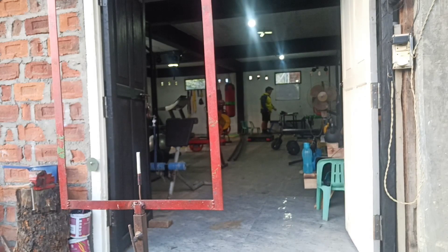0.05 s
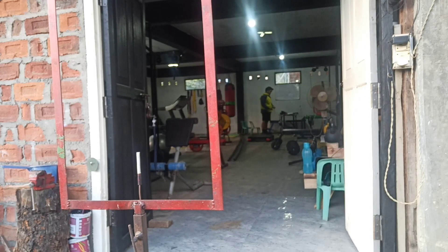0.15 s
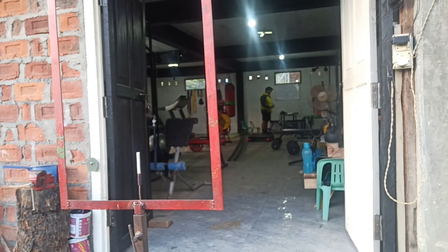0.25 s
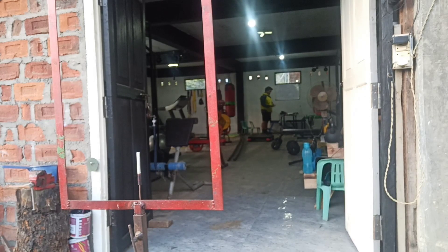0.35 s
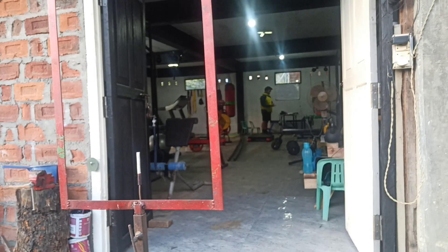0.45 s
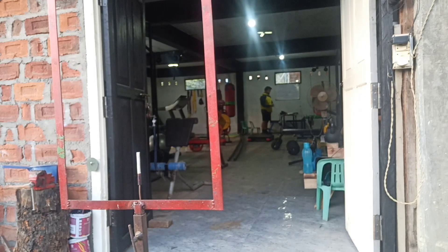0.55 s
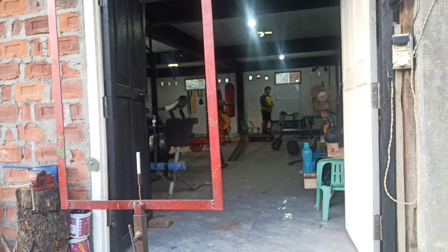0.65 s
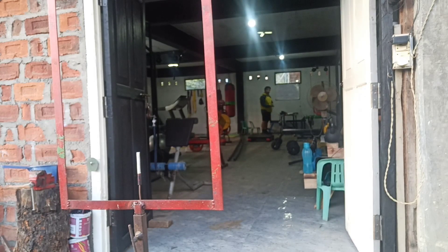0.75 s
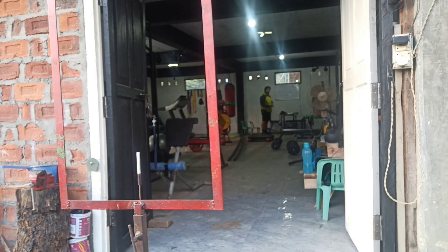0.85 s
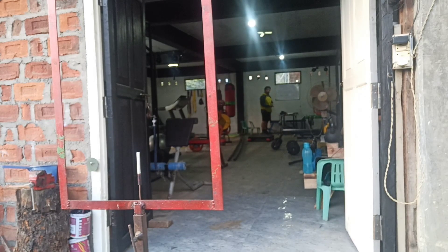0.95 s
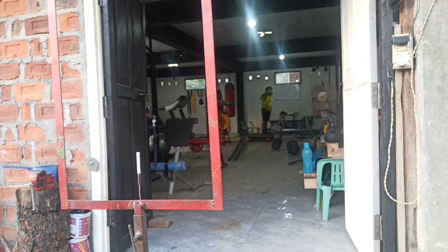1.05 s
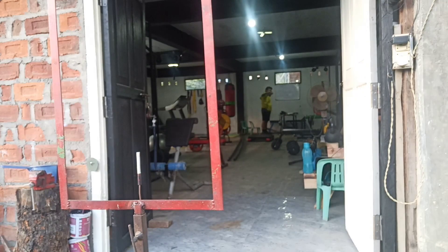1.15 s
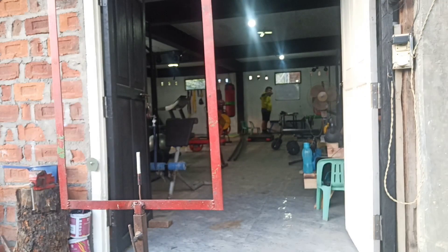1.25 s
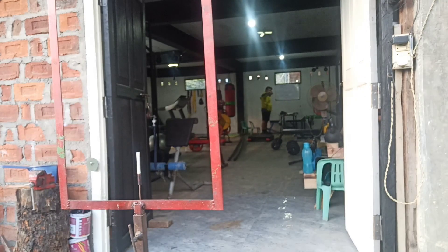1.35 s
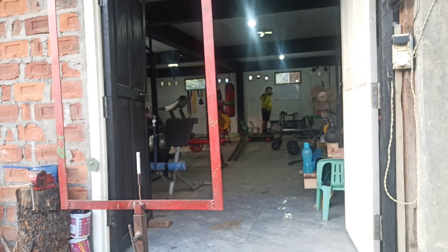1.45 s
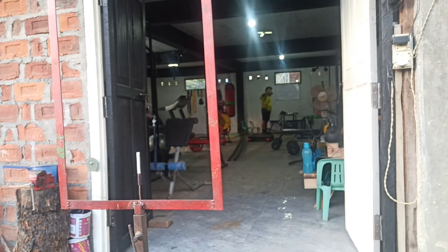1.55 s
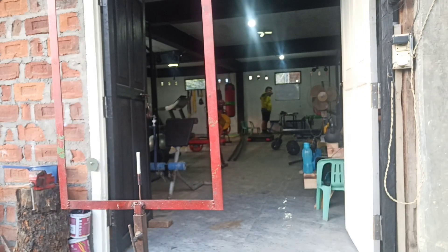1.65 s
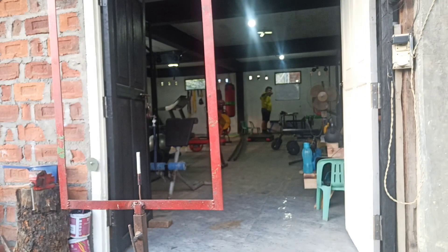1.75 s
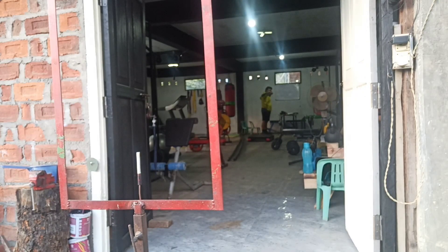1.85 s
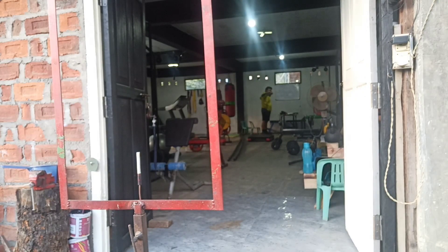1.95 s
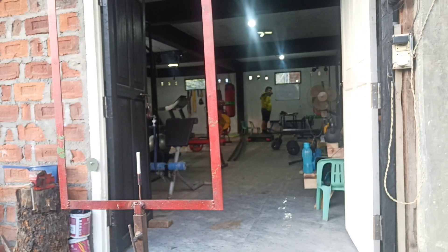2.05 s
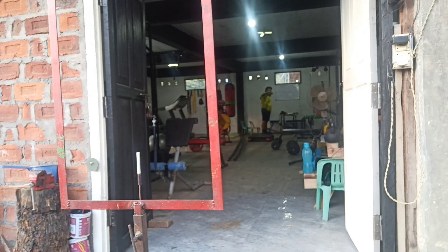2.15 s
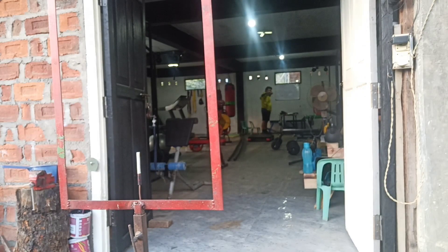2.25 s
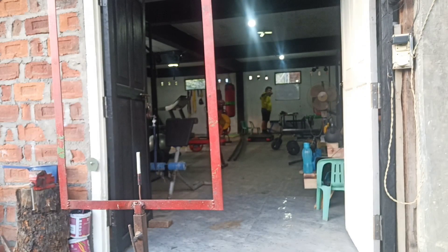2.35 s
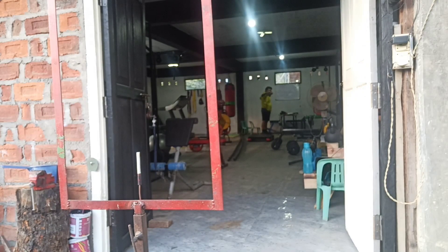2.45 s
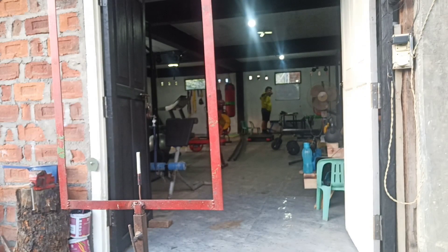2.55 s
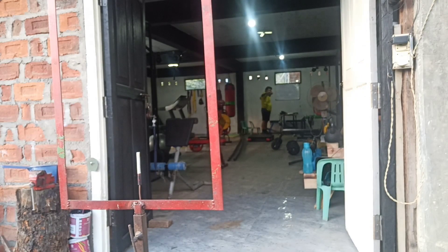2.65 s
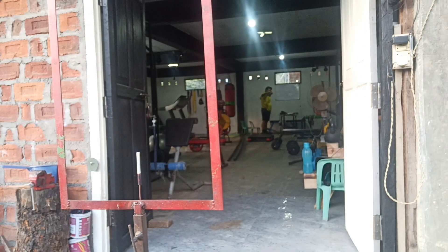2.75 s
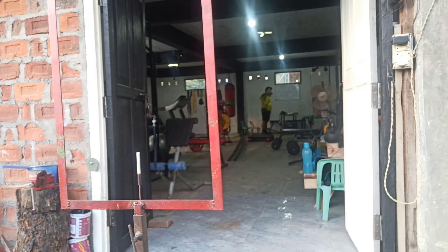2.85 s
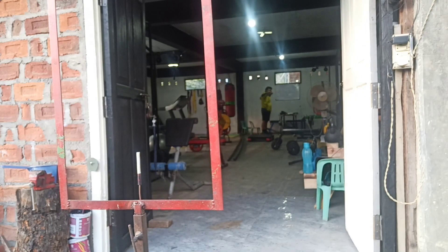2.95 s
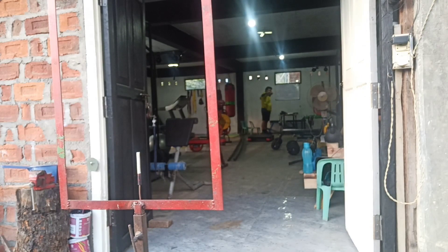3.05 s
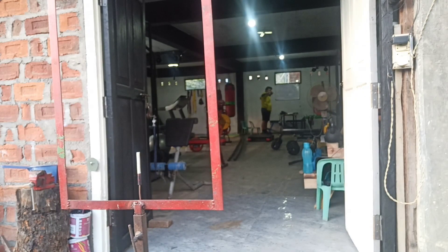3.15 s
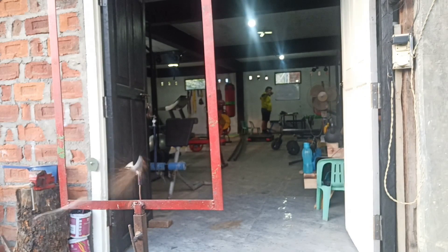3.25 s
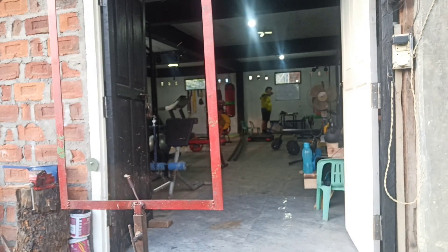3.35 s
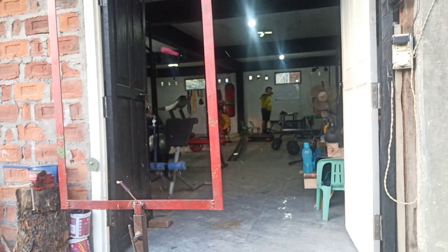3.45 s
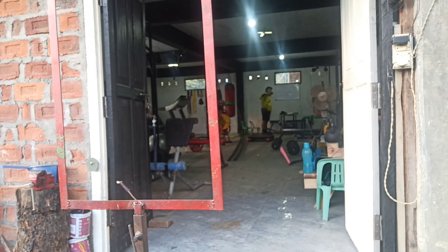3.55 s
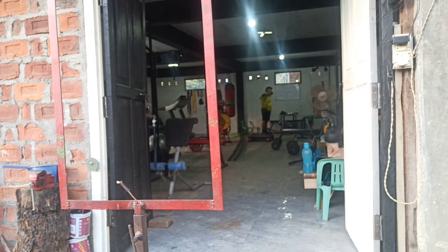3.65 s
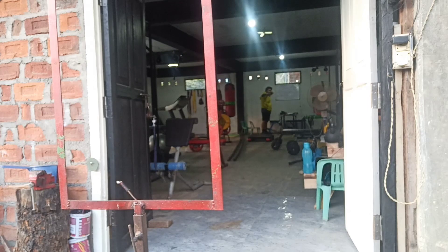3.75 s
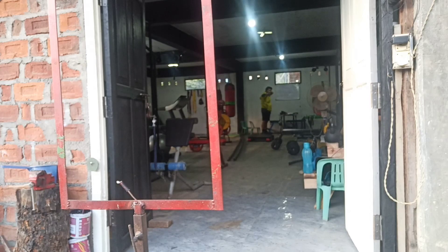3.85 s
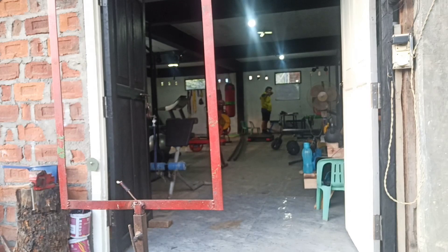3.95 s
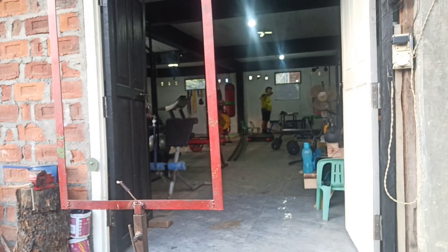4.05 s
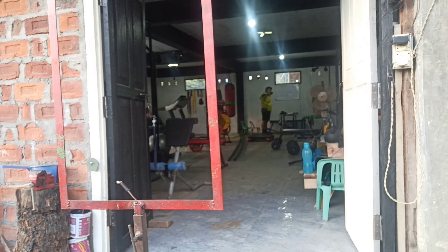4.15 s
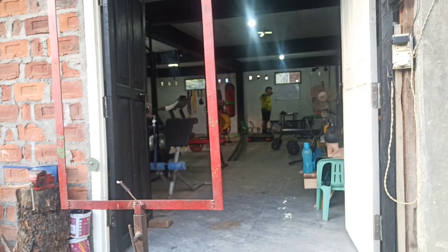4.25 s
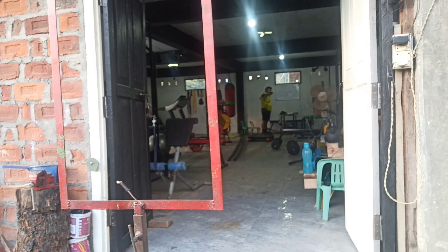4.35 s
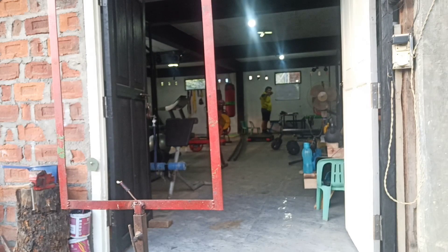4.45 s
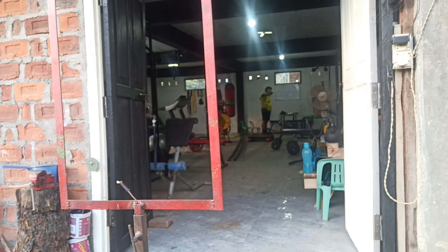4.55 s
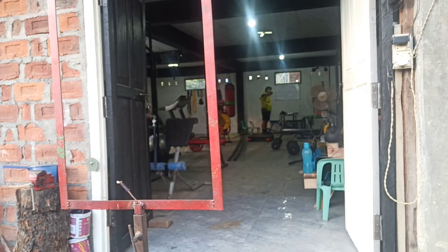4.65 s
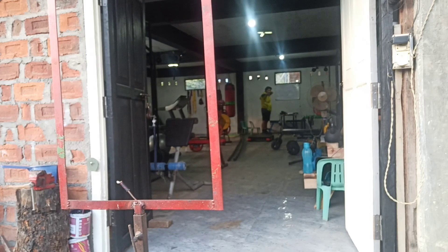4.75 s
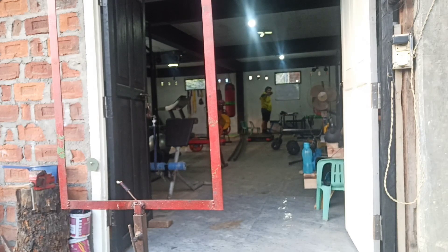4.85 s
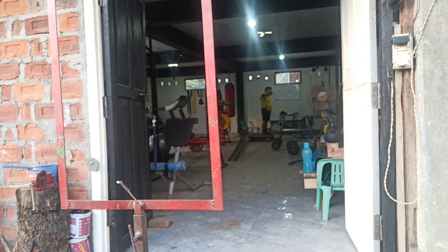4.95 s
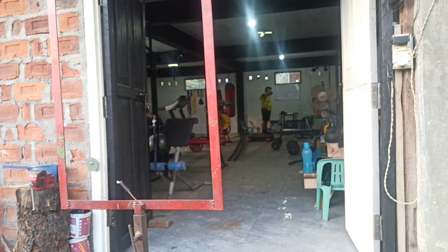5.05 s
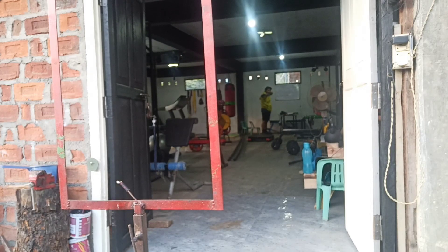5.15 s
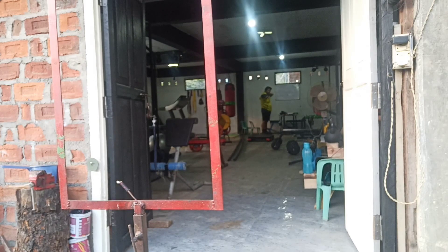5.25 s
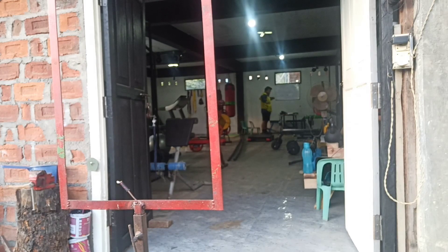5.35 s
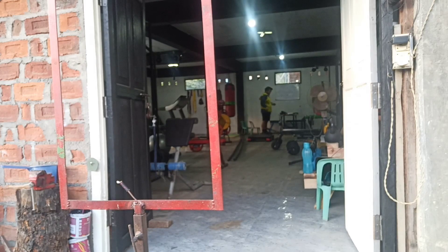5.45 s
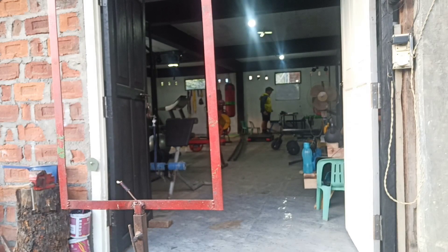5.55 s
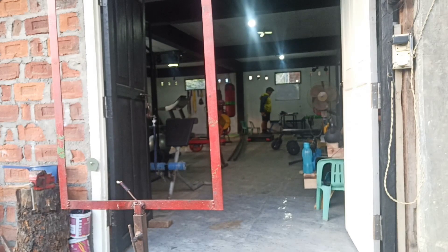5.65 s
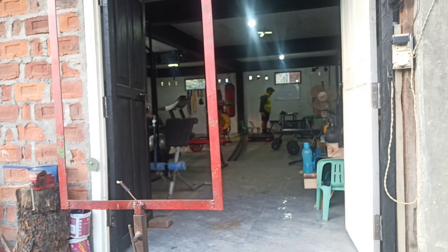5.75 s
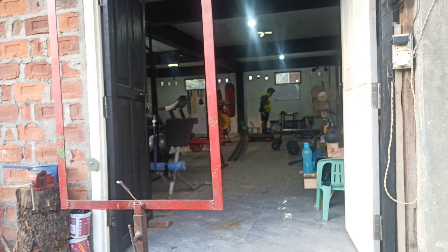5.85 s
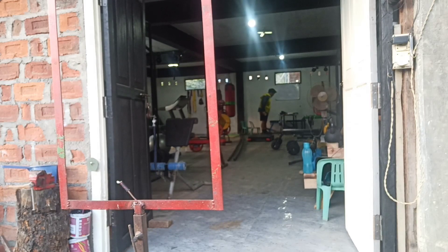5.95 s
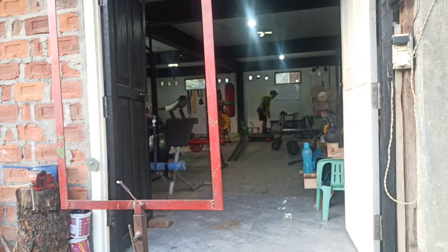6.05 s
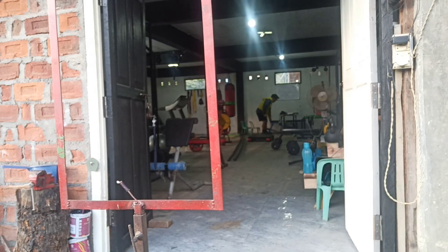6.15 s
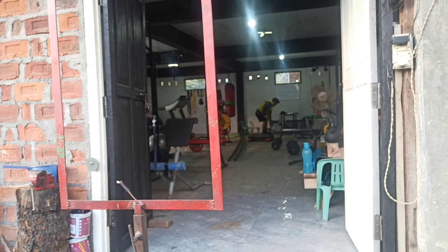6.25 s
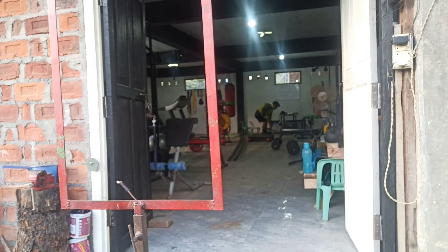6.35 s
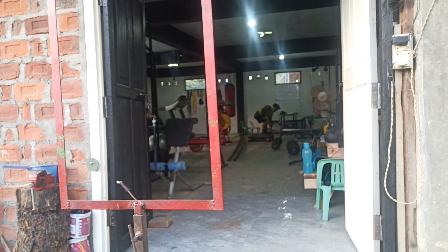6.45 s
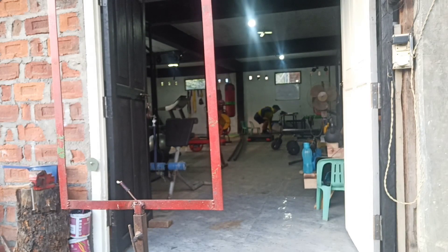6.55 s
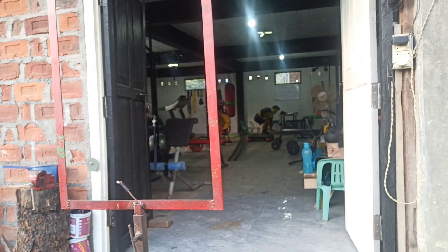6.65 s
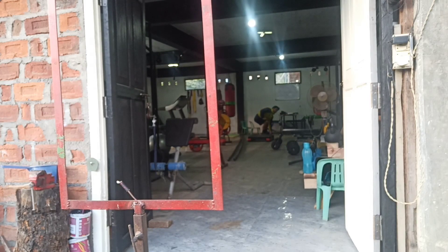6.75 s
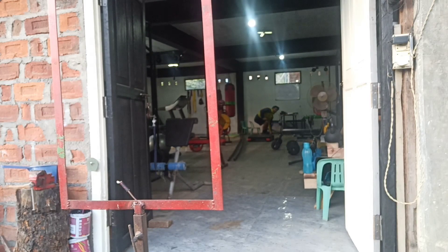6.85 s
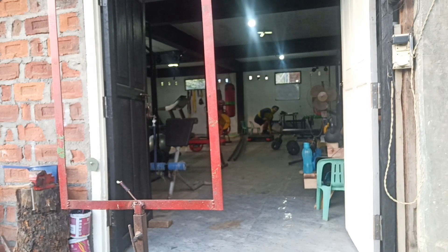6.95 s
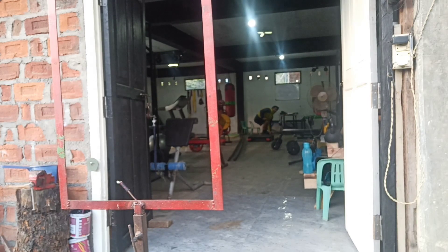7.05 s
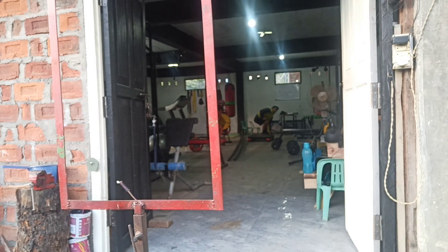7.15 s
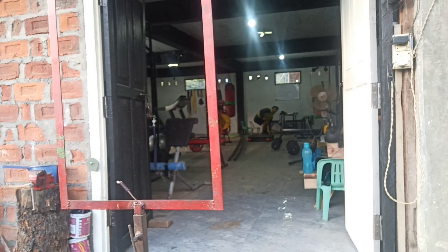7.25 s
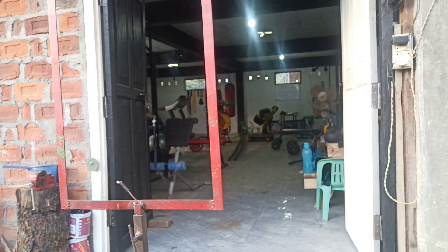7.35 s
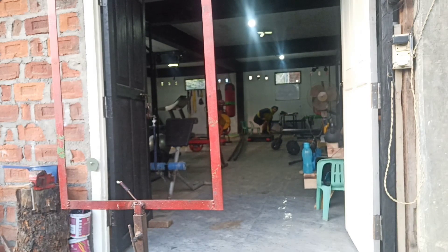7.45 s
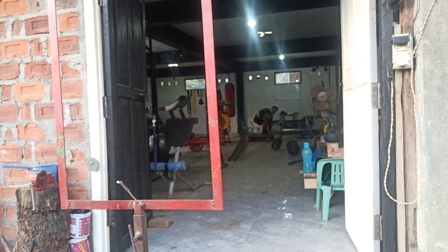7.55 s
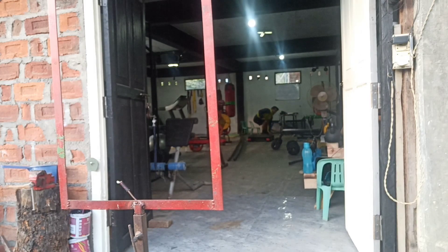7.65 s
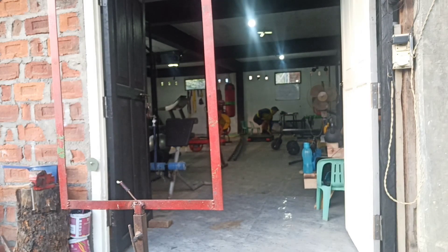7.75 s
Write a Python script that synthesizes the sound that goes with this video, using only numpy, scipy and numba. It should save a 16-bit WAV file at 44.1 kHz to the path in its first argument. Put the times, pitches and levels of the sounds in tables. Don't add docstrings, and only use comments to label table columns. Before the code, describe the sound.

A slingshot snaps far off, a sharp crack and heavy thud hit close by, then a metal bar clangs and rings through a hall.

```python
import sys
import numpy as np
from scipy import signal
from scipy.fft import rfft, irfft, next_fast_len
from scipy.io import wavfile
from scipy.ndimage import uniform_filter1d
from numba import njit

SR = 44100
rng = np.random.default_rng(int(sys.argv[2]) if len(sys.argv) > 2 else 0)


def convert_level_to_amplitude(level_db):
    exponent = np.asarray(level_db, float) / 20
    return 10 ** exponent


def to_wav(sig):
    pcm = np.clip(np.atleast_2d(sig), -1, 1) * 32767
    pcm = np.round(pcm).astype(np.int16)
    wavfile.write(sys.argv[1], SR, pcm.T)


N = 343980

HITS = {"rustle": [(3.2568, -30.5, -28.5, 9970), (5.99, -51, -71, 8000), (6.869, -51, -71.5, 8470),
        (7.385, -55, -69, 6950)], "slap": [(3.2575, -33.5, -40, 1320), (3.2574, -39, -40, 249),
        (3.413, -16.5, -39, 1760), (3.8115, -30, -59, 8550), (4.3469, -48.5, -56, 9640),
        (4.759, -13.5, -24, 10040)], "crack": [(3.3925, -7.5, -38, 7580), (3.3945, -12.5, -41, 7620),
        (3.397, -19, -50, 7010), (3.4222, -16, -47, 3823), (4.3469, -51, -53, 3800)],
        "ping": [(4.3468, -40.5, -49.5, 2320), (4.759, -17.5, -29, 3365)],
        "smack": [(3.4077, -10, -34, 3000), (3.883, -22, -42, 3780), (4.759, -32.5, -48.5, 500)],
        "knock": [(3.437, -25, -44.5, 3034), (3.902, -21.5, -56.5, 2986)]}
CONTACTS = {"rustle": (12, 1), "slap": (9.9, 0.77), "crack": (2.2, .5), "ping": (5.8, 0.29),
            "smack": (3.3, 2.1), "knock": (2.5, 1.2)}
# t/s, direct level/dB
TICKS = [(3.69, -43.5), (3.72, -42), (3.7829, -45), (3.838, -39), (3.94, -43.5), (4.063, -60.5),
         (4.113, -52), (4.18, -53), (4.2141, -42)]
TICK_MS, TICK_HZ, TICK_OCTAVES = 0.98, 9000, 1.5
TICK_HALL_DB = -22
# t/s, peak level/dB, f/Hz, T60/s, hall level/dB
THUDS = [(3.4085, -2, 227.3, 0.067, -21), (3.4079, -11, 467, 0.051, -23.5), (3.4087, -16, 388.7, .05, -40),
         (3.4088, -19, 844, 0.027, -45), (3.4091, -36, 89.8, .05, -36.5), (3.43, -28, 252.4, 2.3, -39),
         (3.43, -26, 358, .9, -46), (5.476, -45.5, 176, 0.14, -64.5), (5.48, -49.5, 488, 0.053, -66.5),
         (6.619, -43, 219, 0.093, -67.5), (6.63, -41.5, 261.5, 0.04, -66), (6.62, -54, 620, 0.045, -65.5),
         (7.178, -45.5, 225, 0.059, -69)]
# t/s, pressure/1, half-width/ms
WAKE = [
    (3.3903, .11, 5),
    (3.4063, -.08, 3.5),
]

# f/Hz, level/dB, T60/s
BAR = [(883, -20, 0.92), (1531.8, -4, 1.374), (1800, -3.5, 0.7), (2140, -11.5, .6), (2349, -6, 0.64),
       (2432, -1, 0.8), (3010, -7.5, .6), (3364, -5, 0.92), (3600, -3, .75), (3893, -7, 0.89),
       (4300, -13.5, 0.4), (7200, -7, 0.37), (7400, -6.5, 0.83), (7575, -4.5, .6)]
BAR_S, BAR_DB, BAR_SWELL_S = 4.759, -18, 0.09
BEAT_DB = 1.5
# f/Hz, level/dB
FRAME = [(300, -41.5), (1300, -34), (1700, -17.5), (2500, -7.5), (4500, -14.5), (7000, -7.5), (10000, -12),
         (15500, -16.5)]
FRAME_DB, FRAME_WET_DB = -33.5, -52
FRAME_T60_S, FRAME_SWELL_S = 0.42, 0.12

# f/Hz, T60/s
HALL = [(80, 1.5), (160, 1.6), (250, 1.82), (400, 1.44), (800, 1.45), (1500, 0.99), (4000, 0.98),
        (8000, 0.83), (12000, 0.5), (15000, .42)]
HALL_RISE_S = 0.0024

CHIRPS = {"cheep": [(.14, -68, 3390), (1.445, -46.5, 3310), (2.175, -46.5, 3330), (2.38, -54, 3215),
          (2.54, -56, 3490), (3.007, -51.5, 3600), (3.186, -58.5, 2900), (5.945, -64, 3000),
          (6.293, -54, 3400), (7.0, -60, 2890), (7.504, -59, 2870)], "chirp": [(.62, -65, 3700),
          (.88, -65, 3480), (1.08, -62, 3385), (1.99, -62, 3420), (5.65, -66, 4830), (6.53, -61.5, 3580),
          (7.148, -58, 3320)], "seep": [(.8, -65, 6270), (1.08, -64, 5720), (1.468, -62, 5720),
          (1.5, -55.5, 6220), (1.96, -58, 6060), (2.04, -63, 6040), (2.2, -74, 6400), (2.4, -66, 5530),
          (3.08, -60.5, 6050), (6.374, -60.5, 5470)], "pip": [(1.588, -57.5, 6430), (2.6, -64.5, 6600),
          (2.668, -59.5, 6330), (2.74, -68, 5420), (2.835, -51.5, 3950), (3.122, -55, 6470),
          (5.562, -55.5, 6450), (6.486, -54.5, 6460), (7.437, -61.5, 6500)]}
CALL = {"cheep": (1.5, .1, 660), "chirp": (1.5, .12, 900), "seep": (1.3, .115, 900),
        "pip": (1.05, .075, 380)}
YARD_ECHO_T60_S = 0.4

# t/s, length/s, f/Hz, first partial level/dB, second partial level/dB
CROWS = [
    [(0.105, .65, 810, -80.5, -76)],
    [(1.99, .19, 719, -70, -58), (2.23, 0.17, 753, -68, -55.5), (2.48, .3, 754.7, -67, -57),
     (2.76, 0.268, 792, -71.5, -62), (3.09, 0.38, 775, -74, -59)],
    [(7.083, 0.55, 824.4, -72, -75.5)],
]
CROW_ROUGH = [0.014, 0.09, 0.018]
CROW_WAVER = [0.016, .06, 0.014]
# first partial/dB, second partial/dB
CROW_FADE_DB = [(-6.5, -4), (-2.5, -14), (0.5, -3.5)]
CROW_ATTACK_S, CROW_RELEASE_S = 0.04, 0.05
CROW_RATTLE_HZ = 100.3
CROW_SAG = 0.015

# f/Hz, width/Hz, level/dB
ENGINE_LINES = [(59, 10, -4), (97, 9.3, 3), (178.5, 8.9, 2)]
ENGINE_DB, ENGINE_LOPE_DB = -65, 1.5
ENGINE_STOPS_S, ENGINE_FADE_S = 1.25, 0.028

# f/Hz, level per Hz/dB
YARD = [(30, -37), (60, -3.5), (120, 1), (400, -8.5), (900, -16.5), (1300, -15.5), (2500, -22.5),
        (4000, -19), (8000, -26), (15000, -21.5)]
YARD_DB, FLICKER_DB = -64, 1.4
GUST_S, GUST_DB, GUST_LENGTH_S, GUST_HZ = 6.49, 5.5, 0.35, 1508

# f/Hz, level/dB
MIC = [(20, -9), (90, -3), (900, 3), (1100, 0.5), (4700, 0), (4900, -6), (6000, -3.5), (6250, 1.5),
       (7600, 3.5), (7800, -1), (8550, -4.5), (8750, -17.5), (11500, -27.5), (11700, -6.5)]
# f/Hz, level/dB
END_COLOUR = [(60, -12), (1000, 4), (3000, -9), (8500, -5), (12000, 4.5), (13500, -5), (15000, -22)]
SWITCH_S, TOP_HZ = 7.722, 15550
HISS_DB = -88
LIMIT_DB, ATTACK_S, RELEASE_S, RATIO = -22, 0.017, 0.049, 2.2

SHORT = 2 ** 13
SIZE = next_fast_len(N + 3 * SR)
T = np.arange(N) / SR
HZ = np.maximum(np.arange(SIZE // 2 + 1) * SR / SIZE, 1)


def hits():
    near, far = np.zeros(N), np.zeros(N)
    t = T[:SHORT] - SHORT / 2 / SR
    rows = [(*row, *CONTACTS[kind]) for kind in HITS for row in HITS[kind]]
    rows += [(s, db, db + TICK_HALL_DB, TICK_HZ, TICK_MS, TICK_OCTAVES) for s, db in TICKS]
    for s, direct_db, hall_db, hz, ms, octaves in rows:
        fade = (t >= 0) * np.exp(-np.abs(t) * 1000 / ms)
        puff = colour(fade * rng.standard_normal(SHORT), hz, octaves)
        add(near, s + t[0], convert_level_to_amplitude(direct_db) * puff / np.abs(puff).max())
        add(far, s + t[0], convert_level_to_amplitude(hall_db) * click(hz, octaves))
    return near, far


def thuds():
    near = sum(push * np.exp(-((s - T) * 1000 / ms) ** 2) for s, push, ms in WAKE)
    far = np.zeros(N)
    for s, peak_db, hz, t60, hall_db in THUDS:
        t = T[:int(t60 * SR)]
        add(near, s, convert_level_to_amplitude(peak_db - 60 * t / t60) * np.sin(2 * np.pi * hz * t))
        add(far, s + 1 / hz - SHORT / 2 / SR, convert_level_to_amplitude(hall_db) * click(hz, 0.53))
    return near, far


def bar(count=1500):
    place = rng.random(count)
    scatter = rng.standard_normal((count, 2))
    hz = 300 + 15200 * place ** 1.4
    level_db = on_log(FRAME, hz) - 1.5 + 0.98 * scatter[:, 0]
    t60 = FRAME_T60_S * convert_level_to_amplitude(1.2 * scatter[:, 1]) / np.hypot(1, hz / 11000)
    frame = ring(np.transpose([hz, level_db, t60]), FRAME_SWELL_S, 0.51)
    beating = convert_level_to_amplitude(BAR_DB + BEAT_DB * walk(25.0))
    strong = beating * ring(BAR, BAR_SWELL_S, 0.91)
    return strong + convert_level_to_amplitude(FRAME_DB) * frame, convert_level_to_amplitude(FRAME_WET_DB) * frame + convert_level_to_amplitude(-50) * strong


def sparrows():
    song = np.zeros(N)
    burr = np.tanh(0.9 * walk(1200))
    calls = [(*row, *CALL[call]) for call in CHIRPS for row in CHIRPS[call]]
    for s, db, last_hz, fall, length, hoarse in calls:
        first_hz = fall * last_hz
        u = np.arange(0, 1, 1 / (length * SR))
        glide = last_hz + (first_hz - last_hz) * (1 - u) ** 2.4
        pitch = glide + hoarse * burr[int(s * SR):][:len(u)]
        phase = 2 * np.pi * np.cumsum(pitch) / SR
        whistle = np.sin(phase) + 0.082 * np.sin(2 * phase)
        add(song, s, convert_level_to_amplitude(db) * np.sin(np.pi * u ** 0.51) * whistle)
    walls = rng.standard_normal(SR // 2) * convert_level_to_amplitude(-60 * T[:SR // 2] / YARD_ECHO_T60_S)
    smeared = shape(song, rfft(walls, SIZE))
    return convert_level_to_amplitude(-8.0) * song + convert_level_to_amplitude(-36.0) * smeared, convert_level_to_amplitude(-46.0) * song


def roosters():
    crow = np.zeros(N)
    for rows, rough, scatter, fades in zip(CROWS, CROW_ROUGH, CROW_WAVER, CROW_FADE_DB):
        waver = 1 + scatter * walk(300)
        rattle = 2 * np.pi * np.cumsum(CROW_RATTLE_HZ * (1 + 0.3 * walk(40))) / SR
        flutter_db = 40 * rough * np.array([walk(30), walk(30)])
        for s, length, hz, first_db, second_db in rows:
            u = np.clip((T - s) / length, 0, 1)
            rise, fall = (T - s) / CROW_ATTACK_S, (s + length - T) / CROW_RELEASE_S
            breath = np.clip(np.minimum(rise, fall), 0, 1)
            phase = 2 * np.pi * np.cumsum(hz * (1 - CROW_SAG * u) * waver) / SR
            first = np.sin(phase) + 15.0 * rough * np.sin(phase - rattle)
            second = np.sin(2 * phase) + 1.7 * rough * np.sin(2 * phase - rattle)
            for partial, db, fade_db, flutter in zip((first, second), (first_db, second_db), fades, flutter_db):
                crow += breath * convert_level_to_amplitude(db + fade_db * u + flutter) * partial
    return convert_level_to_amplitude(-2) * crow, convert_level_to_amplitude(-36.0) * crow


def engine():
    gain = sum(convert_level_to_amplitude(db) / np.hypot(1, (HZ - hz) / width) ** 2 for hz, width, db in ENGINE_LINES)
    drone = shape(rng.standard_normal(N), gain)
    lope = convert_level_to_amplitude(ENGINE_DB + ENGINE_LOPE_DB * walk(7.8))
    running = np.clip((ENGINE_STOPS_S - T) / ENGINE_FADE_S, 0, 1)
    return drone / drone.std() * lope * running


def yard():
    air = 0
    gust_db = GUST_DB * np.exp(-((T - GUST_S) / GUST_LENGTH_S) ** 2)
    for hz in 30 * 2 ** np.arange(10):
        band = shape(rng.standard_normal(N), bell(hz, 0.4) * convert_level_to_amplitude(on_log(YARD)))
        air = air + band * convert_level_to_amplitude(FLICKER_DB * walk(4.4) + gust_db * bell(GUST_HZ, 1.8, axis=hz))
    return air / air.std() * convert_level_to_amplitude(YARD_DB)


def hall():
    t, tail = T[:3 * SR], 0
    for hz in 50 * 2 ** np.arange(0, 8.6, 0.5):
        band = shape(rng.standard_normal(3 * SR), bell(hz, 1 / 4))[:3 * SR]
        tail = tail + band * convert_level_to_amplitude(-60 * t / on_log(HALL, hz))
    return rfft(tail * (1 - np.exp(-t / HALL_RISE_S)), SIZE)


def ring(modes, swell_s, late):
    out = np.zeros(2 * SR)
    for hz, db, t60 in modes:
        t = T[:int(min(t60, 2) * SR)]
        out[:len(t)] += convert_level_to_amplitude(db - 60 * t / t60) * np.sin(2 * np.pi * (hz * t + rng.random()))
    swell = (1 - min(late, 1) * np.exp(-T[:2 * SR] / swell_s)) ** 2
    track = np.zeros(N)
    add(track, BAR_S, out * swell)
    return track


def click(hz, octaves):
    pulse = colour(1.0 * (np.arange(SHORT) == SHORT // 2), hz, octaves)
    return pulse / np.sqrt(np.sum(pulse ** 2))


def colour(x, hz, octaves):
    axis = np.maximum(np.arange(SHORT // 2 + 1) * SR / SHORT, 1)
    return irfft(rfft(x, SHORT) * bell(hz, octaves, axis=axis), SHORT)


def add(track, s, sound):
    start = int(s * SR)
    track[start:start + len(sound)] += sound[:N - start]


def shape(x, gain):
    return irfft(rfft(x, SIZE) * gain, SIZE)[:N]


def on_log(table, hz=HZ):
    table_hz, values = np.array(table)[:, 0], np.array(table)[:, 1]
    return np.interp(np.log(hz), np.log(table_hz), values)


def bell(hz, octaves, axis=HZ):
    return np.exp(-0.5 * (np.log2(axis / hz) / octaves) ** 2)


def walk(rate):
    k = int(SR / rate)
    steps = np.repeat(rng.standard_normal(N // k + 1), k)
    return uniform_filter1d(uniform_filter1d(steps, k), k)[:N]


@njit
def follow(x, attack, release):
    env, e = np.empty(len(x)), 1e-6
    for i in range(len(x)):
        e += (abs(x[i]) - e) * (attack if abs(x[i]) > e else release)
        env[i] = e
    return env


def scene():
    parts = [hits(), thuds(), bar(), sparrows(), roosters()]
    direct = sum(near for near, far in parts)
    echo = shape(sum(far for near, far in parts), hall())
    return (direct + echo + engine() + yard())[None]


def band_limit(x):
    return signal.sosfilt(signal.butter(12, 16690, fs=SR, output="sos"), x)


def record(dry):
    main_part = shape(dry[0], convert_level_to_amplitude(on_log(MIC)) * (HZ < TOP_HZ))
    end_part = shape(dry[0], convert_level_to_amplitude(on_log(END_COLOUR)) * (HZ < TOP_HZ))
    hiss = convert_level_to_amplitude(HISS_DB) * shape(rng.standard_normal(N), bell(10000, 0.2))
    heard = np.where(T < SWITCH_S, main_part, end_part) + hiss
    env = follow(heard, 1 / (ATTACK_S * SR), 1 / (RELEASE_S * SR))
    mix = heard * np.minimum(convert_level_to_amplitude(LIMIT_DB) / env, 1) ** (1 - 1 / RATIO)
    return band_limit(mix[None])


dry = scene()
out = record(dry)
to_wav(out)
```